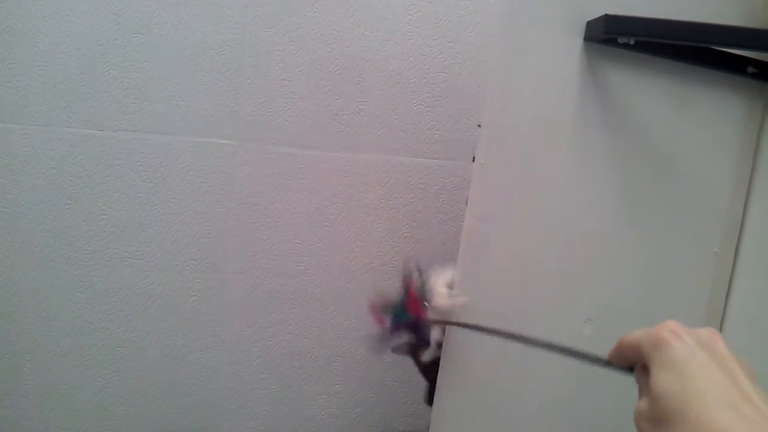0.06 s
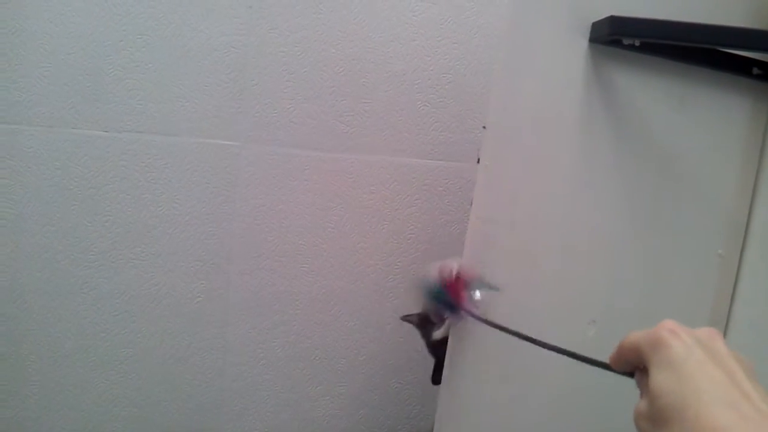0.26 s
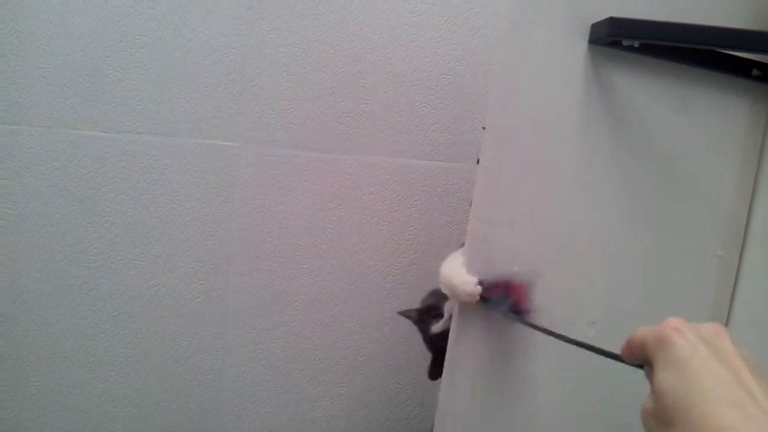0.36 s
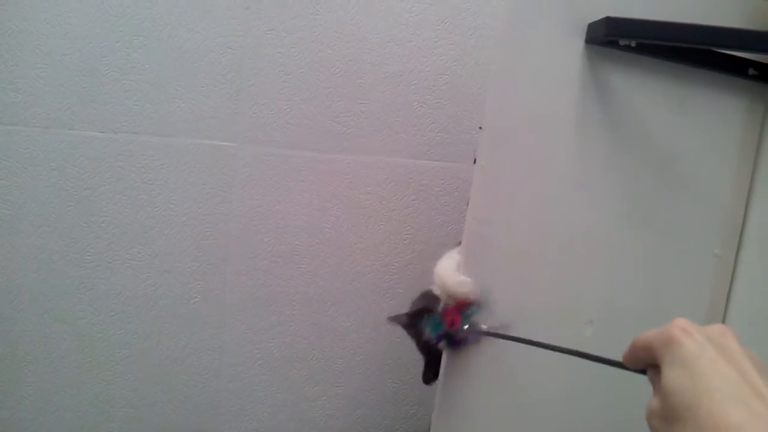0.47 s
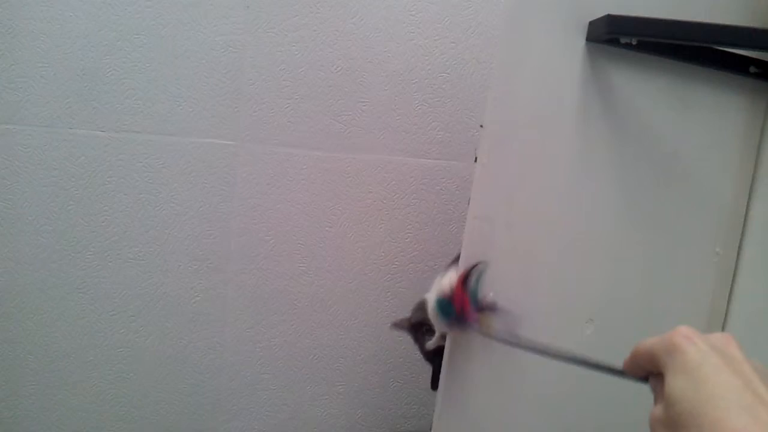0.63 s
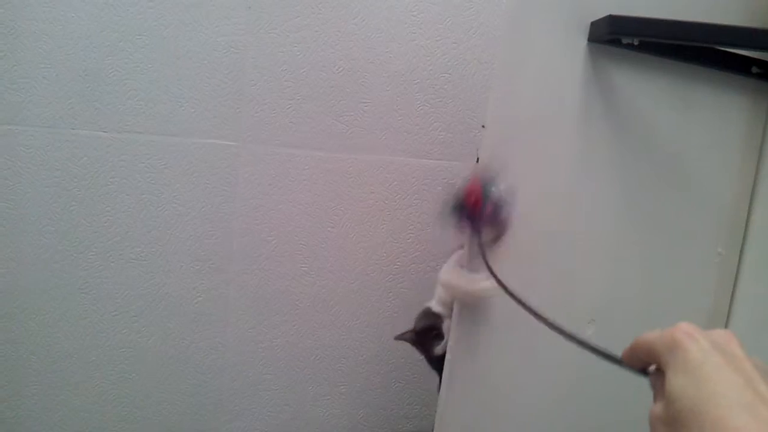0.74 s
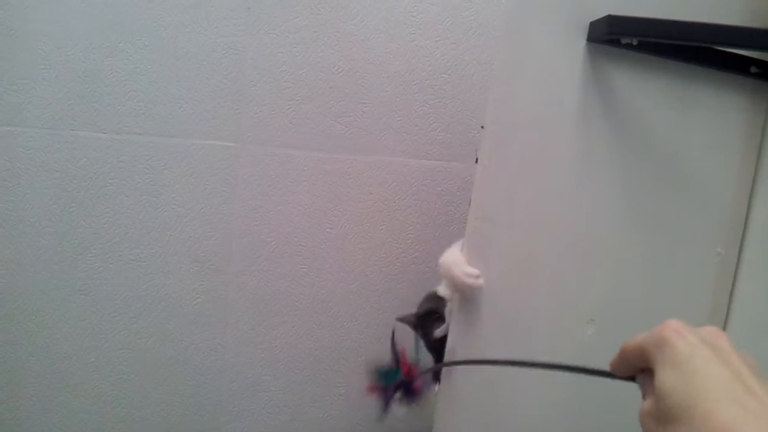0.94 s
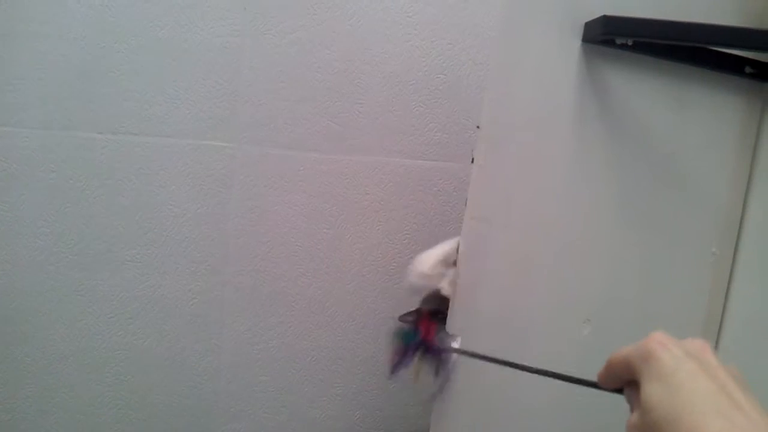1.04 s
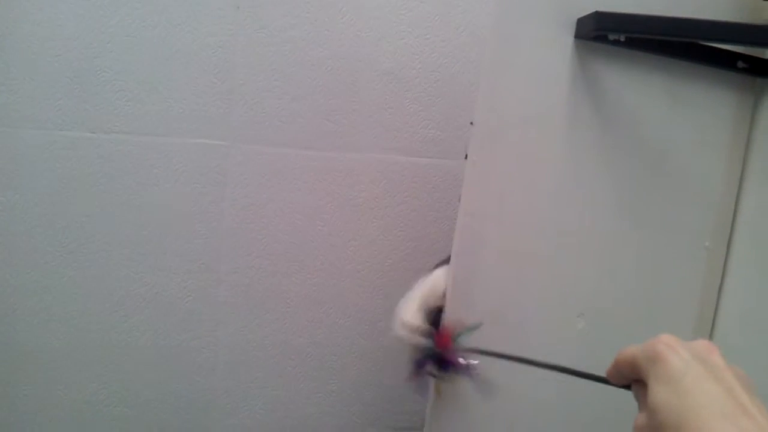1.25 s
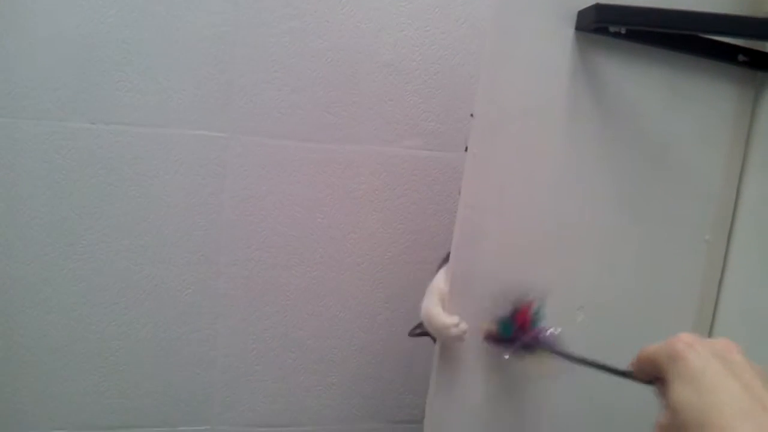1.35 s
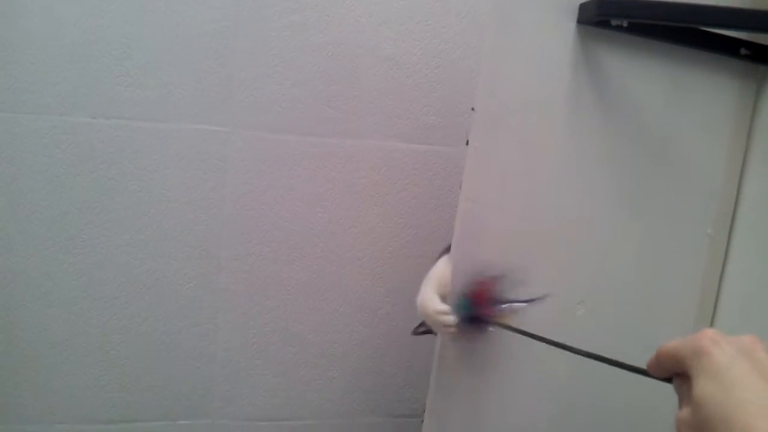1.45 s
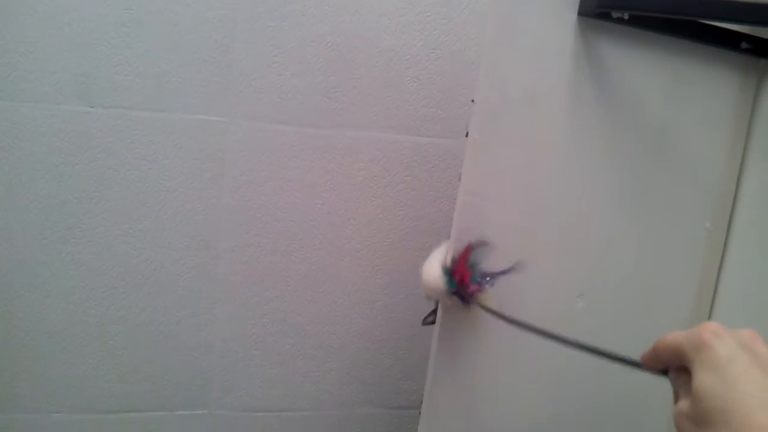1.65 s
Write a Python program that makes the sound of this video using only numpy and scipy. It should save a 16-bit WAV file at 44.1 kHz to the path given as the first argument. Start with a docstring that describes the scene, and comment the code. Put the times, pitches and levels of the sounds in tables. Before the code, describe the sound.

Sharp hollow thumps and claw ticks as a cat swats a feather toy at a door edge, loudest first, then a lighter cluster, a brief scrape and sparse taps, heard close in a quiet, faintly hissing room.

```python
"""Knocks ring a thin door panel: a cat's paw and a feather toy on a wand push it briefly, exciting damped modes.
Claws and wand slap and tick at its edge as short grainy bursts and decaying tones; a dragged claw
scrapes as grains through edge resonances. Feathers and foil rustle as dense filtered grains, with faint
narrow-band rings, and fur rubs the panel. Two microphones hear direct sound, close reflections and a
decaying tail in a quiet room, over shaped noise for its murmur and hiss."""
import sys
import numpy as np
from scipy import signal
from scipy.fft import rfft, irfft, next_fast_len
from scipy.io import wavfile
from scipy.ndimage import uniform_filter1d

SR = 44100
rng = np.random.default_rng(int(sys.argv[2]) if len(sys.argv) > 2 else 0)


def waveform_to_disk(signal):
    """Save audio, clipped to [-1, 1], as 16-bit WAV at the path in sys.argv[1]."""
    frames = np.transpose(np.atleast_2d(signal))
    scaled = np.clip(frames, -1, 1) * 32767
    samples = np.round(scaled).astype(np.int16)
    wavfile.write(sys.argv[1], SR, samples)


def undo_db(level):
    """Turn decibels back into plain size, where 20 dB means ten times bigger."""
    steps = np.asarray(level, float) / 20
    return 10 ** steps


N = 74970  # samples

# strength of the feather rustle and of fur rubbing the panel: time_s, feather_db, fur_db
RUBBING = [(0, -72, -48.5), (.06, -68, -72), (.19, -65.5, -61), (.205, -50, -49), (.26, -47, -34),
           (.285, -43, -44), (.31, -61, -50), (.35, -50, -63), (.385, -46, -44.5), (.43, -60, -59),
           (.47, -69.5, -66), (.6, -64, -57.5), (.63, -47, -65), (.7, -54, -41), (.76, -50.5, -60),
           (.82, -54, -57), (.86, -73, -56.5), (.94, -78, -82), (.96, -49.5, -72.5), (1.06, -55.5, -53),
           (1.1, -81, -69), (1.13, -52, -63), (1.16, -55, -63.5), (1.195, -48.5, -55), (1.24, -57, -57),
           (1.3, -59, -65), (1.35, -63, -58), (1.4, -62, -61.5), (1.5, -74.5, -74), (1.7, -57.5, -66)]


def unit(x):
    """Normalization: scales x to rms 1."""
    return x / np.sqrt(np.mean(x ** 2) + 1e-20)


def along(points, hz):
    """Spectral envelope: interpolates (Hz, value) points on a logarithmic frequency axis."""
    f, v = np.transpose(points)
    return np.interp(np.log(hz + 1), np.log(f + 1), v)


def curves(rows, **ends):
    """Time envelope: one value per sample for each column after the time."""
    s, *cols = np.transpose(rows)
    return [np.interp(np.arange(N) / SR, s, c, **ends) for c in cols]


def filtered(x, response):
    """Linear filtering: multiplies the spectrum of x by a complex response of frequency."""
    m = next_fast_len(x.shape[-1] + 8192)
    spectrum = rfft(x, m) * response(np.fft.rfftfreq(m, 1 / SR))
    return irfft(spectrum, m)[..., :x.shape[-1]]


def peaks(rows):
    """Modal superposition: causal sum of (Hz, width Hz, dB) resonances with alternating sign."""
    def response(f):
        total = 0
        for k, (centre, width, db) in enumerate(rows):
            damping = 1j * f * width
            total = total + (-1) ** k * undo_db(db) * damping / (centre * centre - f * f + damping)
        return total
    return response


def pair(two, alike):
    """Interchannel coherence: mixes two unrelated signals as mid and side to set left-right likeness."""
    def mid_side_gains(hz):
        turn = np.arccos(np.clip(along(alike, hz), -1, 1)) / 2
        return np.array([np.cos(turn), np.sin(turn)])
    mid, side = filtered(two, mid_side_gains)
    return np.array([mid + side, mid - side])


def lean(two, points):
    """Interchannel level difference: shifts the left-right balance per frequency."""
    return filtered(two, lambda hz: undo_db(along(points, hz) * np.array([[.5], [-.5]])))


def grains(rate, size):
    """Random impact process: dense tiny contacts (rate per second) of uneven strength, rms 1."""
    spread_db = 1.5
    hit = rng.random(size) < rate / SR
    strength = rng.standard_normal(size) * undo_db(spread_db * np.minimum(rng.exponential(size=size), 3))
    return unit(hit * strength)


def add(out, s, x):
    """Superposition: adds x to out at time s, in seconds."""
    part = out[round(s * SR):][:len(x)]
    part += x[:len(part)]


def hush():
    """Stationary noise shaped by a spectrum, its bands drifting slowly: low room murmur and hiss."""
    # spectrum of murmur and hiss, relative: frequency_hz, level_db_per_hz
    murmur_spectrum = [(15, -11), (25, -20.5), (154, 2.5), (219, 1.5), (475, -3), (543, -2), (709, -13.5),
                       (1350, -10), (2430, -15.5), (8550, -22.5), (13500, -18), (15000, -27.5)]
    # coherence of the two microphones: frequency_hz, left_right_likeness
    murmur_likeness = [(60, 0.57), (180, 0.66), (550, 0.35), (1650, 0.11), (4970, 0.1), (15000, 0.01)]
    # balance of the two microphones: frequency_hz, left_minus_right_db
    murmur_balance = [(100, 4), (500, -0.5), (2000, 2), (8000, 0)]
    level_db, drift_db = -55.5, 0.5  # rms of the left-right mean; rms drift
    z = signal.stft(rng.standard_normal((2, N)), nperseg=512)[2]
    field = uniform_filter1d(rng.standard_normal(z.shape[1:]), 5, 0)  # smooth over frequency
    field = uniform_filter1d(field, 12, 1)  # and over time
    two = signal.istft(z * undo_db(drift_db * unit(field)), nperseg=512)[1][:, :N]
    two = filtered(two, lambda f: undo_db(along(murmur_spectrum, f)))
    two = lean(pair(two, murmur_likeness), murmur_balance)
    return undo_db(level_db) * two / np.sqrt(np.mean(two.mean(0) ** 2))


def room(x):
    """Reverberation: direct sound, close reflections redrawn at fixed intervals, and a diffuse tail."""
    # decay of the tail: frequency_hz, t60_s
    tail_decay = [(150, 0.29), (700, 0.17), (2500, 0.18), (10000, 0.23)]
    # coherence of the room's answer: frequency_hz, left_right_likeness
    answer_likeness = [(100, 0.54), (300, 0.97), (640, 0.75), (1400, 0), (3000, 0)]
    # balance of near sounds: frequency_hz, left_minus_right_db
    near_balance = [(60, 6), (130, 6), (290, 2.5), (640, 0), (1400, -4.5), (3000, -9), (6000, -1.5),
                    (12000, 2)]
    tail_db, near_db, near_t60_s = -4.5, -7, 0.028
    redraw = 1024  # samples between fresh random draws of the close reflections
    phase_rad, phase_hz = 1.52, 1890  # the microphones come to differ in phase by this above this

    hz, t, z = signal.stft(rng.standard_normal((2, SR // 2)), SR, nperseg=256)
    decay = undo_db(-60 * t / along(tail_decay, hz)[:, None])
    tail = pair(signal.istft(z * decay, SR, nperseg=256)[1], answer_likeness)
    late = np.pad(tail, ((0, 0), (300, 0)))  # starts 300 samples after the direct sound
    late = undo_db(tail_db) * late / np.linalg.norm(tail[0])
    reverb = signal.fftconvolve(x[None], late, axes=1)[:, :N]

    near = np.zeros((2, N + 4 * redraw))
    fade = undo_db(-60 * np.arange(redraw) / SR / near_t60_s)
    padded = np.pad(x, (0, redraw))[None]
    for k in range(0, N, redraw):
        echo = rng.standard_normal((2, redraw)) * fade / np.linalg.norm(fade)
        near[:, k + 10:k + 9 + 2 * redraw] += signal.fftconvolve(padded[:, k:k + redraw], echo, axes=1)
    close = undo_db(near_db) * pair(near[:, :N], answer_likeness)

    def quarter_turn_apart(f):
        return np.exp(.5j * phase_rad * np.tanh((f / phase_hz) ** 2) * np.array([[1], [-1]]))
    direct = filtered(x, quarter_turn_apart)
    return lean(direct + reverb + close, near_balance)


def toy():
    """Friction as dense micro-impacts: feather rustle, claw scrape, and thin narrow-band rings."""
    # spectrum of the rustle, relative: frequency_hz, level_db_per_hz
    feather_spectrum = [(400, -17.5), (900, -4.5), (1500, -5), (2500, -4.5), (4500, -7.5), (7000, -4.5),
                        (10000, -11), (14500, -24.5)]
    # claw dragging on the edge: time_s, level_db
    scrape_levels = [(1.0, -48), (1.012, -34.5), (1.03, -41.5), (1.042, -54), (1.05, -76), (1.075, -82)]
    # edge resonances that the scrape rings: centre_hz, width_hz, level_db
    edge_modes = [(2440, 230, -7.5), (3700, 370, -6), (4050, 290, -2), (5500, 1400, -15.5),
                  (7970, 1140, -14.5)]
    # faint thin rings from the toy: start_s, length_s, pitch_hz, level_db
    thin_rings = [(0.141, 0.024, 5100, -56.5), (1.126, 0.033, 7300, -69), (1.216, 0.045, 7160, -57.5)]
    grains_per_s, ring_width_hz = 3500, 300
    rubbed = grains(grains_per_s, N) + 0.57 * rng.standard_normal(N)
    rustle = unit(filtered(rubbed, lambda f: undo_db(along(feather_spectrum, f))))
    out = undo_db(curves(RUBBING)[0]) * rustle
    scrape = unit(filtered(grains(4500, N), peaks(edge_modes)))
    out = out + undo_db(curves(scrape_levels, left=-120, right=-120)[0]) * scrape
    for s, length, hz, db in thin_rings:
        t = np.arange(round(length * SR)) / SR
        noise = rng.standard_normal(len(t))
        tone = unit(filtered(noise, lambda f: np.exp(-((f - hz) / ring_width_hz) ** 2)))
        add(out, s, undo_db(db) * tone * np.sin(np.pi * t / length) ** .5)
    return out


def slaps():
    """Transient impacts: band-limited grainy bursts and exponentially decaying sharp ticks."""
    # feathers and claws slapping the edge: start_s, length_s, level_db, centre_hz
    edge_slaps = [(0.137, 0.022, -49.5, 4170), (0.2083, 0.0057, -35, 3240), (0.217, 0.0054, -25.5, 3820),
                  (0.2218, 0.0027, -22, 3240), (0.3633, 0.0048, -30.5, 4400), (.367, 0.0072, -36, 6000),
                  (.368, 0.0086, -35, 1320), (0.3919, 0.0061, -29, 4640), (0.396, 0.0082, -28.5, 1340),
                  (0.533, 0.0054, -46.5, 4320), (0.58, .004, -68, 4000), (0.634, 0.0058, -26.5, 4480),
                  (0.638, 0.0032, -45, 7900), (0.66, 0.0015, -32, 2520), (0.698, 0.0027, -36, 2200),
                  (0.7197, 0.009, -44, 3060), (0.8284, 0.0042, -40, 3230), (.9712, 0.0044, -30.5, 4800),
                  (.976, 0.017, -36, 1450), (1.041, 0.0027, -43, 2400), (1.156, 0.0083, -41.5, 2780),
                  (1.2038, 0.0047, -32.5, 3540), (1.209, 0.0042, -32, 1400), (1.317, 0.005, -45.5, 5830),
                  (1.3524, 0.013, -44.5, 2940), (1.604, 0.0029, -39.5, 6900)]
    # sharp ticks of claw or wand tip: start_s, decay_s, level_db, pitch_hz
    tip_ticks = [(.2224, .001, -19, 3000), (.3952, .0015, -22, 4500), (.6393, .001, -26, 4500),
                 (.665, .0008, -33, 3500), (.7232, .0008, -33, 3500), (.9948, .0005, -27, 2800),
                 (1.0437, .0012, -28, 2500), (1.2035, .0006, -33, 4000), (1.318, .0005, -41, 6000),
                 (1.3578, .001, -39, 4500)]
    rise_share, spread_octaves = .6, 0.82  # rise as a share of the length; spread around the centre
    out, t = np.zeros(N), np.arange(SR // 10) / SR
    for s, length, db, hz in edge_slaps:
        shape = np.minimum(t / (rise_share * length), 1) * np.exp(-(t / length) ** 2)
        colour = lambda f: np.exp(-(np.log2((f + 1) / hz) / spread_octaves) ** 2 / 2)
        puff = shape * filtered(grains(12000, len(t)), colour)
        add(out, s, undo_db(db) * puff * np.linalg.norm(shape) / np.linalg.norm(puff))  # energy of the shape
    for s, decay, db, hz in tip_ticks:
        tick = np.sin(2 * np.pi * hz * t) + .4 * rng.standard_normal(len(t))
        add(out, s, undo_db(db) * np.exp(-t / decay) * tick)
    return out


def panel():
    """Modal excitation by short pushes: longer contact sounds duller; rubbing fur rings the modes too."""
    # blows, levels relative to one another: start_s, level_db, contact_ms
    blows = [(0.2172, -32, 0.54), (0.2227, -10.5, 0.37), (.372, -35.5, 1.2), (.3952, -33.5, 1.17),
             (0.623, -38, 1.2), (0.6386, -23, 0.54), (.665, -23.5, .6), (.7005, -26, .8), (.7232, -24, .7),
             (.956, -34.5, 1.4), (0.9742, -30.5, 1.5), (0.99, -42, 1.5), (0.996, -30.5, 1.74),
             (1.0432, -38.5, 0.95), (1.134, -44, 0.5), (1.212, -39.5, 0.31)]
    # panel modes, levels before the variation per blow: pitch_hz, level_db, t60_s
    modes = [(127, -12, 0.2), (161.4, -4, 0.067), (263, -8, 0.096), (324, 1, 0.018), (354.3, -1.5, 0.067),
             (454, -5, 0.045), (613, -1, 0.083), (726, 6, 0.048), (863, 0.5, 0.04), (940, 3.5, 0.012),
             (1007, -1, 0.039), (1080, -4, 0.083), (1343, 2.5, 0.054), (1557, -14, 0.025),
             (1800, -5.5, 0.014), (2400, -13, 0.12), (2850, -26, .03)]
    # the many small modes between the named ones, relative: frequency_hz, level_db_per_hz
    clutter_spectrum = [(100, -6), (250, 0), (600, -4), (1300, -6), (2500, 3.5), (5000, -58), (10000, -41)]
    clutter_t60_s, knock_low_cut_hz = .08, 119  # steep low cut of the microphones on the knocks
    out, t = np.zeros(N), np.arange(SR // 4) / SR
    vary_db = rng.normal(0, 2, (len(blows), len(modes)))
    for (s, db, ms), vary in zip(blows, vary_db):
        ring = np.zeros(len(t))
        for (hz, level, t60), change in zip(modes, vary):
            ring += undo_db(level + change - 60 * t / t60) * np.sin(2 * np.pi * hz * t)
        noise = rng.standard_normal(len(t))
        clutter = unit(filtered(noise, lambda f: undo_db(along(clutter_spectrum, f))))
        ring = ring + undo_db(-60 * t / clutter_t60_s) * clutter
        contact = t[:300] / (ms / 1000)
        push = np.sin(np.pi * np.minimum(contact, 1)) ** 2
        add(out, s, undo_db(db - 11.5) * np.convolve(ring, push / push.sum()))
    body = peaks([(hz, 9 / t60, level) for hz, level, t60 in modes])  # broader than the freely ringing modes
    fur = unit(filtered(grains(3000, N), body))
    out = out + undo_db(curves(RUBBING)[1]) * fur
    return signal.sosfilt(signal.butter(4, knock_low_cut_hz, "high", fs=SR, output="sos"), out)


def scene():
    """Superposition of everything near the door, heard in the room through the microphones' low cut."""
    low_cut_hz = 92
    near = room(panel()) + room(slaps()) + room(toy())
    return signal.sosfilt(signal.butter(2, low_cut_hz, "high", fs=SR, output="sos"), near) + hush()


def top_cut(x):
    """Nothing passes above the cut-off."""
    return signal.sosfilt(signal.butter(12, 15750, fs=SR, output="sos"), x)


def record(dry):
    """Band limitation: the treble falls steeply around the top frequency to a small remainder."""
    top_hz = 14700
    mix = filtered(dry, lambda hz: np.clip((top_hz + 150 - hz) / 300, .03, 1))
    return top_cut(mix)


dry = scene()
out = record(dry)
waveform_to_disk(out)
```